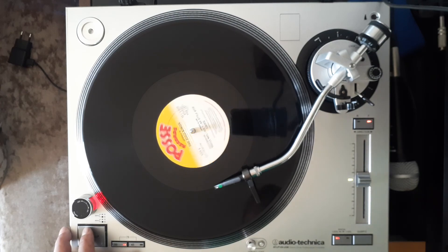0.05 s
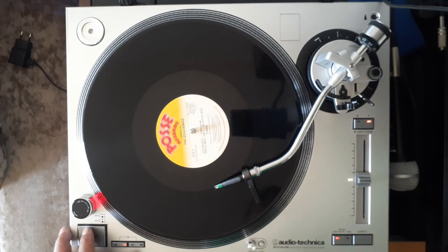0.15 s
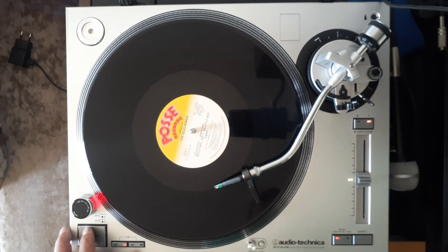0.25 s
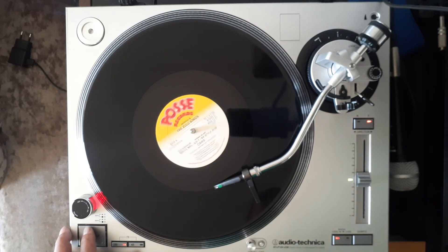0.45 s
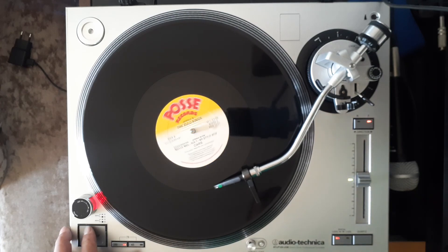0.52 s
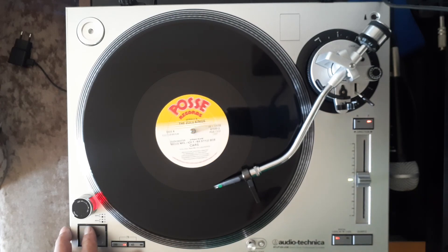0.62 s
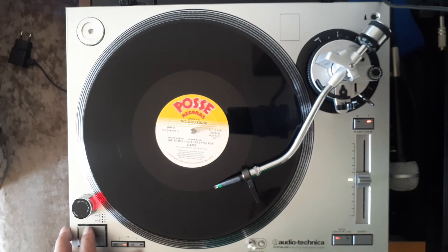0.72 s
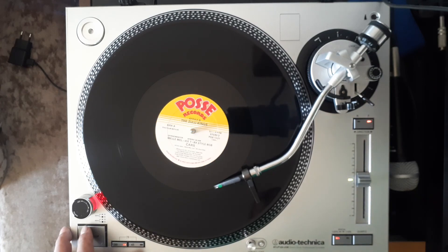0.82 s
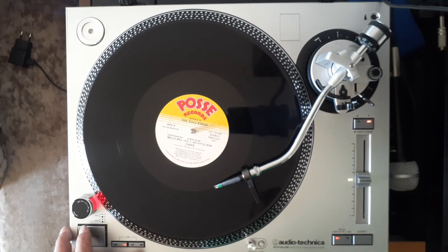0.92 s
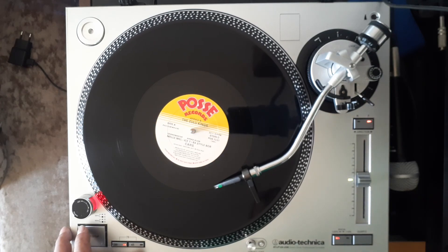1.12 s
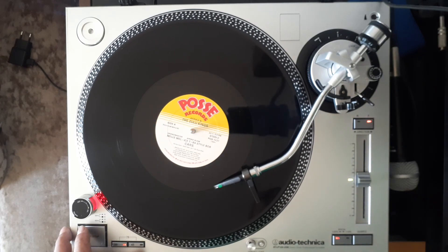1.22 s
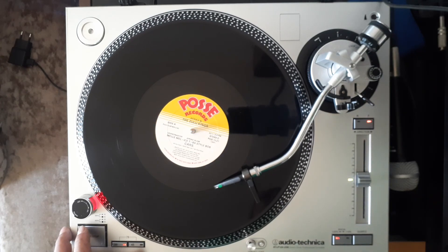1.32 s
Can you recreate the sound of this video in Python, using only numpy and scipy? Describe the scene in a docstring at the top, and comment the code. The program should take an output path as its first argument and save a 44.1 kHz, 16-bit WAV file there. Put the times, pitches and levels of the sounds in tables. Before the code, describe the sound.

Vinyl crackle, heard directly from the pickup with no room sound: dusty ticks, pops and one heavy thump over rumble and hiss. The platter then slows, groans briefly and stops, leaving a low ring that dies away.

```python
"""Record end groove, braking to a stop

A stylus rides the worn groove, heard straight from the pickup. Dust and scratches click
over friction hiss, rumble and faint amplifier hiss; one deep scar thumps the arm.
The platter brakes: the crackle thins and softens, the casing groans, and the deck
shudders to a stop and rings out low on its feet."""
import sys
import numpy as np
from scipy import signal
from scipy.fft import rfft, irfft
from scipy.io import wavfile
from scipy.ndimage import uniform_filter1d

SR = 44100
rng = np.random.default_rng(int(sys.argv[2]) if len(sys.argv) > 2 else 0)


def waveform_to_disk(signal):
    """Save audio, clipped to [-1, 1], as 16-bit WAV at the path in sys.argv[1]."""
    frames = np.transpose(np.atleast_2d(signal))
    scaled = np.clip(frames, -1, 1) * 32767
    samples = np.round(scaled).astype(np.int16)
    wavfile.write(sys.argv[1], SR, samples)


N = 59535
T = np.arange(N) / SR
STOP_S = 0.83  # platter at rest


def amp(db):
    """Decibels to gain."""
    return 10 ** (np.asarray(db) / 20)


def curve(points, t):
    """Breakpoints interpolated over time."""
    return np.interp(t, *np.transpose(points))


def spectrum_at(points, hz):
    """Breakpoints interpolated over log frequency."""
    f, db = np.transpose(points)
    return np.interp(np.log(hz + 1), np.log(f + 1), db)


def add(mix, start_s, sound):
    """Mix a sound in at start_s."""
    part = mix[max(round(start_s * SR), 0):][:len(sound)]
    part += sound[:len(part)]


def noise(spectrum):
    """Coloured noise, unit rms."""
    gain = amp(spectrum_at(spectrum, np.fft.rfftfreq(N, 1 / SR)))
    x = irfft(rfft(rng.standard_normal(N)) * gain, N)
    return x / x.std()


def decay(db, t60_s):
    """Envelope of a struck mode."""
    return amp(db - 60 * T / t60_s)


def pickup(size=4096):
    """Minimum-phase response of cartridge and preamp: frequencies, complex gains."""
    # magnitude response: f/Hz, gain/dB
    magnitude = [(20,-15),(55,0.5),(150,8),(500,1.9),(2000,-3.5),(6000,-11.5),(11000,-14),(15000,-17)]
    log_gain = np.log(amp(spectrum_at(magnitude, abs(np.fft.fftfreq(size, 1 / SR)))))
    response = np.exp(np.conj(signal.hilbert(log_gain)))
    return np.fft.rfftfreq(size, 1 / SR), response[:size // 2 + 1]


def flick(edge_hz, hz, response, lead=2.29):
    """Stylus meets a flaw: a quick leading flick, then a longer swing back. Unit peak."""
    s = 1j * hz / edge_hz
    x = irfft(response * (lead * s - 1) / (1 + s) ** 3)
    return x / abs(x).max()


def dust(speed, full_speed_per_s=600, spread_db=5, level_db=-40):
    """Fine crackle of specks, sparser and softer as the groove slows."""
    # speck classes: edge/Hz
    edges_hz = [2560, 5200, 8900, 15000]
    out, colour = np.zeros(N), pickup()
    for edge_hz in edges_hz:
        hit = rng.random(N) < speed * full_speed_per_s / len(edges_hz) / SR
        size = amp(spread_db * np.minimum(rng.exponential(1, N), 3.2))
        polarity = rng.choice([-1, 1], N)
        out += signal.oaconvolve(hit * size * polarity, flick(edge_hz, *colour))[:N]
    return amp(level_db) * speed ** 1.8 * out


def surface(speed, level_db=-38.5, grain_db=5.0):
    """Grainy friction hiss of the groove wall, swelling over scuffs and as the stylus creeps at the end."""
    # scuffed stretches, then the stylus creeping as the platter settles: t/s, length/s, level/dB
    scuffs = [(.02,0.043,-41),(.095,0.046,-43),(0.189,0.014,-41),(0.261,0.011,-28),(0.493,0.047,-37.5),(0.793,0.033,-53),(0.819,0.048,-56),(1.071,.06,-62)]
    # plain wall hiss: f/Hz, relative density/dB
    wall_spectrum = [(100,-9),(400,0),(1000,-2),(2500,-9),(6000,-16),(15000,-23.5)]
    # scuff hiss: f/Hz, relative density/dB
    scuff_spectrum = [(100,2),(600,12),(2000,-0.5),(6000,-2),(15000,-13.5)]
    flutter = uniform_filter1d(rng.standard_normal(N), size=60)
    grain = amp(grain_db * flutter / flutter.std())
    scuffed = np.zeros(N)
    for start_s, length_s, db in scuffs:
        add(scuffed, start_s, amp(db) * signal.windows.tukey(max(int(length_s * SR), 2)))
    wall = amp(level_db) * speed ** 1.52 * noise(wall_spectrum)
    hiss = wall + scuffed * noise(scuff_spectrum)
    return hiss * grain / np.sqrt(np.mean(grain ** 2))


def rumble():
    """Groove unevenness and the shudder of the braking platter."""
    # rumble colour: f/Hz, relative density/dB
    spectrum = [(20,-40),(45,-10),(65,2),(115,0.5),(175,0.5),(270,-4),(360,-19.5),(560,-13.5),(900,-43),(3000,-51)]
    # rumble envelope: t/s, level/dB
    envelope = [(0,-36),(.06,-31),(.12,-32.5),(.19,-41),(.31,-29),(.44,-32),(.57,-28),(.63,-34),(.72,-39),(.78,-30),(.83,-30),(.9,-43),(1.0,-51.5),(1.35,-60)]
    return amp(curve(envelope, T)) * noise(spectrum)


def amplifier_hiss(level_db=-54.5, fade_from_s=0.95, fade_db_per_s=14):
    """Faint electronic hiss, fading at the end."""
    # noise floor: f/Hz, relative density/dB
    spectrum = [(100,-8),(300,-6),(700,-7),(1500,-9),(3000,-14.5),(6000,-17),(15500,-20.5)]
    return amp(level_db - fade_db_per_s * np.maximum(T - fade_from_s, 0)) * noise(spectrum)


def clicks(gain_db=-0.96, crumbs=7, grit_db=-18, grit_edge_hz=7000, lead_s=0.0003, scatter_s=0.00065):
    """Distinct pops and ticks, each amid crumbs of grit; a wide flaw has a low edge and sounds dull."""
    # specks and scratches: t/s, level/dB, edge/Hz
    flaws = [(.0106,-14.5,3200),(0.014,-41,6200),(0.0295,-23,5800),(.0337,-13,5100),(0.0662,-17,2100),(0.117,-20.5,8000),
             (0.1204,-15.5,5660),(.1409,-21,5600),(.1587,-28.5,5000),(0.181,-21.5,4670),(0.2012,-24,9000),(0.2058,-23.5,6000),(0.2228,-11.5,6250),(0.2275,-10.5,4370),(.2284,-13,4400),(0.2297,-7.5,2900),(0.2384,-8.5,4900),(0.241,-17,4800),
             (.2637,-16,18000),(0.2704,-11,2000),(0.2719,-8.5,2500),(0.2732,-6.5,2150),(0.3162,-23,4800),(0.3188,-17.5,8550),(0.321,-11,2400),(0.3346,-12.5,14100),
             (0.3376,-24,5800),(0.3435,-11,3270),(0.359,-12,5250),(0.3652,-15,4140),(.3670,-14.5,4400),(.3735,-21,10000),(0.3825,-17.5,10000),
             (0.3905,-16.5,12000),(0.3948,-17,14000),(0.4126,-15,2370),(0.4304,-22,14900),(0.4438,-13.5,1852),(0.4476,-19,5800),(0.4734,-15.5,7950),
             (0.4988,-22,7000),(0.509,-23,12000),(0.5135,-11.5,5760),(0.5206,-22,10000),(0.5255,-15.5,4500),(0.547,-17.5,5800),(.5518,-25,4180),(0.5635,-13,2310),
             (.5780,-17.5,16000),(.5810,-18,7000),(0.5974,-13,7660),(0.6021,-17.5,8000),(0.6363,-20,6000),(0.6449,-20,1750),(0.6468,-4,1620),(0.7063,-23,2600),(0.7413,-27,6000),
             (0.7613,-20,3300),(0.7724,-29,5800),(.7882,-23.5,2880),(0.7958,-22,2250),(0.8044,-24,4200),(.8130,-18.5,5000),(0.8216,-25.5,1800),(1.160,-41.5,1200)]
    out, colour = np.zeros(N), pickup()
    crumb = flick(grit_edge_hz, *colour)
    for start_s, db, edge_hz in flaws:
        add(out, start_s, amp(db + gain_db) * flick(edge_hz, *colour))
        grit = amp(db + grit_db) * min(2 * edge_hz / grit_edge_hz, 1) ** 2
        for offset, size in rng.standard_normal((crumbs, 2)):
            add(out, start_s - lead_s + offset * scatter_s, size * grit * crumb)
    return out


def deck_bounce(feet_hz=60, rise_s=0.014, turning_t60_s=0.18, stop_db=-26.5, stop_t60_s=1.15):
    """The deck bounces on its feet, longest once the platter stands still."""
    # jolts of the deck: t/s, level/dB
    jolts = [(.05,-44),(.585,-23),(.648,-19),(.834,-23.5)]
    sway, rise = np.zeros(N), np.minimum(T / rise_s, 1)
    for start_s, db in jolts:
        add(sway, start_s, rise * decay(db, turning_t60_s))
    add(sway, STOP_S, rise * decay(stop_db, stop_t60_s))
    return sway * np.sin(2 * np.pi * feet_hz * T)


def arm_thumps(end_hz=63.4, sag_s=0.0037, subsonic_hz=38):
    """Deep thumps, each sagging in pitch as it dies away."""
    # jolts of the arm: t/s, level/dB, initial f/Hz, rise/s, decay constant/s
    jolts = [(.2730,1,326,.0016,0.0086),(0.542,-14,141,0.0026,0.0032),(.5630,-19,263,0.0018,0.007),(0.6474,-22,170,0.0019,.005),(0.811,-23,260,.003,0.0064),(0.8377,-10.5,240,0.0046,0.0064),(1.275,-36.5,298,0.0022,.005)]
    out = np.zeros(N)
    for start_s, db, start_hz, rise_s, fade_s in jolts:
        hz = end_hz + (start_hz - end_hz) * np.exp(-T / sag_s)
        envelope = np.sin(np.pi / 2 * np.minimum(T / rise_s, 1)) ** 2 * np.exp(-T / fade_s)
        add(out, start_s, amp(db) * envelope * np.sin(2 * np.pi * np.cumsum(hz) / SR))
    return signal.sosfilt(signal.butter(2, subsonic_hz, "high", fs=SR, output="sos"), out)


def arm_ring(scar_s=0.275):
    """The tonearm rings after the deep scar."""
    # arm modes: f/Hz, level/dB, t60/s
    modes = [(288,-33,0.29),(415,-52,0.11),(567.4,-26.5,0.26)]
    out = np.zeros(N)
    for hz, db, t60_s in modes:
        add(out, scar_s, decay(db, t60_s) * np.sin(2 * np.pi * hz * T))
    return out


def casing_groan(low_hz=172.1, waver_depth=0.03546, smooth_samples=1500):
    """The dragging brake drives the casing's modes, each wavering in pitch."""
    # brake drive: t/s, low mode level/dB, upper modes level/dB
    drive = [(.3,-66,-62),(.45,-42,-52),(.49,-28.5,-42),(.535,-33.5,-44.5),(.572,-23,-33),(.62,-42,-53),(.69,-50,-67),(.76,-52,-40),(.82,-23.5,-26.5),(.86,-38,-44),(0.901,-35.5,-62),(.99,-59.5,-85),(1.12,-55.5,-70),(1.35,-68.5,-84)]
    # upper modes: f/Hz, relative level/dB
    upper_modes = [(262,-0.5),(560,-18)]

    def tone(hz):
        waver = uniform_filter1d(rng.standard_normal(N), smooth_samples)
        waver = uniform_filter1d(waver, smooth_samples)
        pitch_hz = hz * (1 + waver_depth * waver / waver.std())
        return np.sqrt(2) * np.sin(2 * np.pi * np.cumsum(pitch_hz) / SR)

    times_s, low_db, upper_db = np.transpose(drive)
    upper = sum(amp(db) * tone(hz) for hz, db in upper_modes)
    low = tone(low_hz)
    return amp(np.interp(T, times_s, low_db)) * low + amp(np.interp(T, times_s, upper_db)) * upper


def scene():
    """Pickup output, mono."""
    # platter speed: t/s, fraction of full speed
    platter = [(0,0.91),(.52,0.87),(.62,0.62),(.7,0.35),(.81,0.49),(.845,0.43)]
    # groove wear, scaling dust and surface hiss: t/s, gain/dB
    wear = [(0,0),(.12,0),(.165,-4),(.21,1),(.29,0.5),(.36,4),(.45,0.5),(.53,2.5)]
    speed = curve(platter, T) * (T < STOP_S)
    groove = amp(curve(wear, T)) * (dust(speed) + surface(speed))
    stylus = groove + clicks() + rumble()
    body = deck_bounce() + arm_thumps() + arm_ring() + casing_groan()
    return (stylus + body + amplifier_hiss())[None]


def record(dry, cutoff_hz=15830):
    """Steep low-pass band limit."""
    lowpass = signal.firwin(511, cutoff_hz, window=("kaiser", 9), fs=SR)
    return signal.oaconvolve(dry, lowpass[None], "same")


dry = scene()
out = record(dry)
waveform_to_disk(out)
```